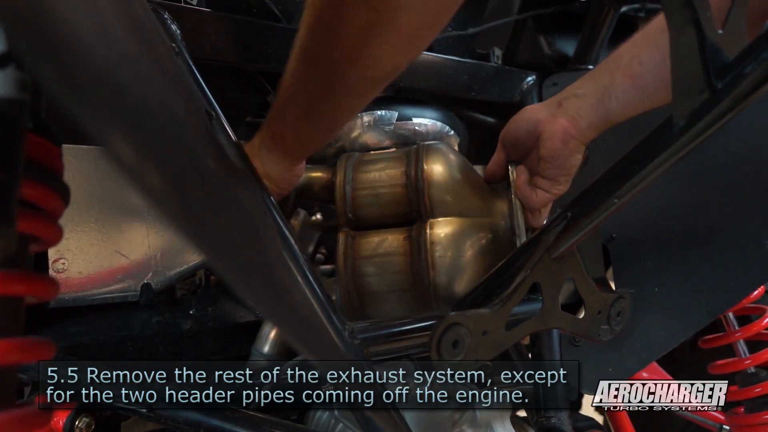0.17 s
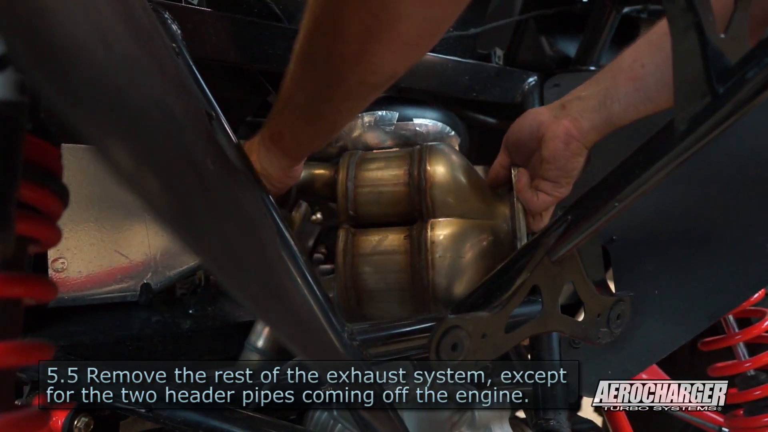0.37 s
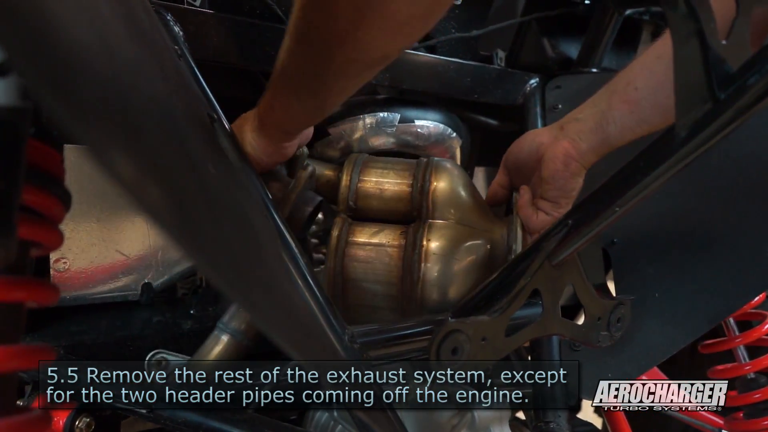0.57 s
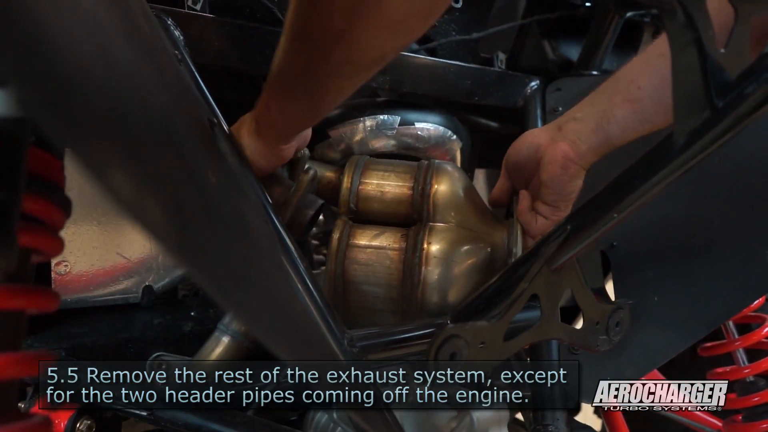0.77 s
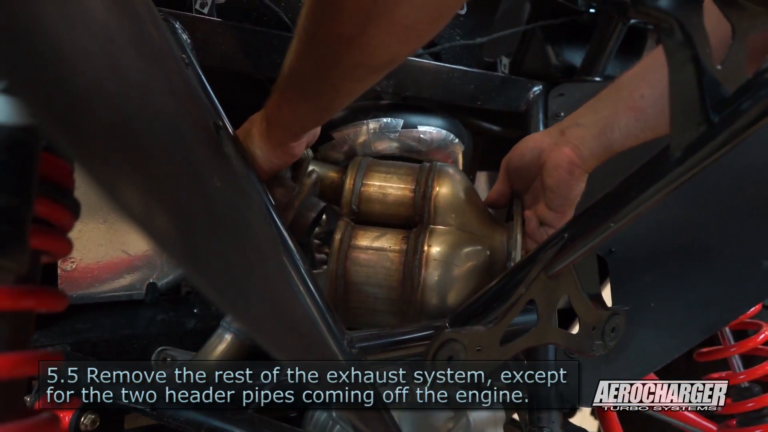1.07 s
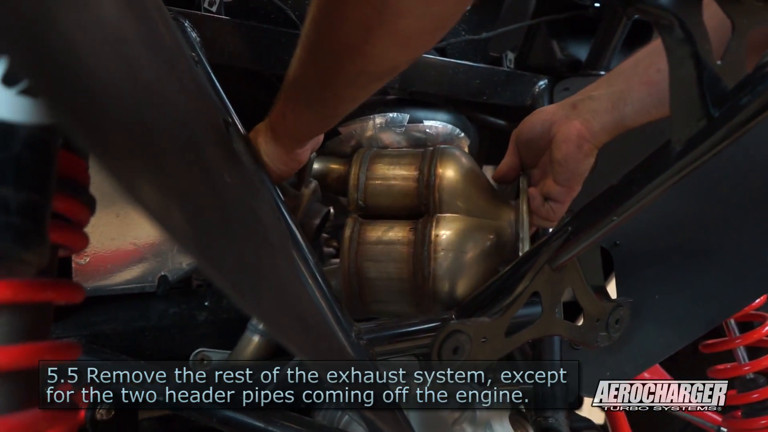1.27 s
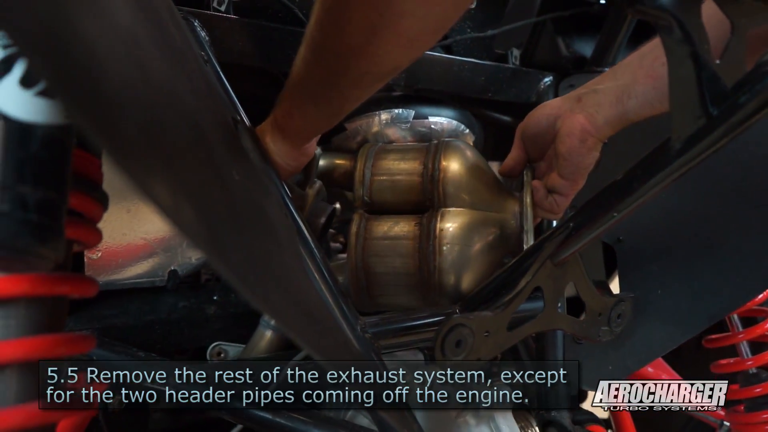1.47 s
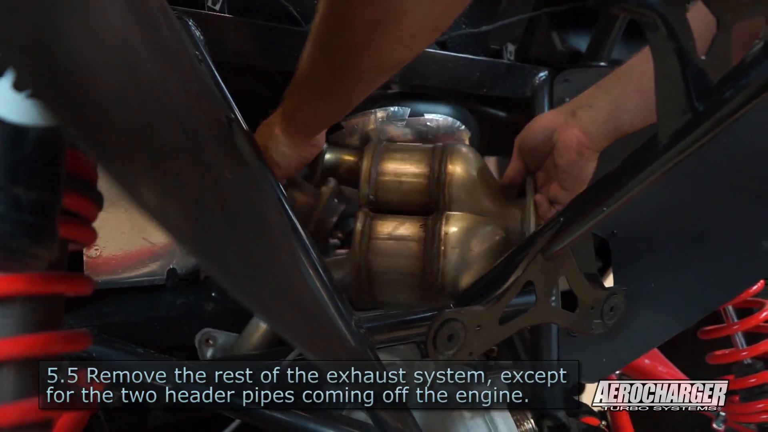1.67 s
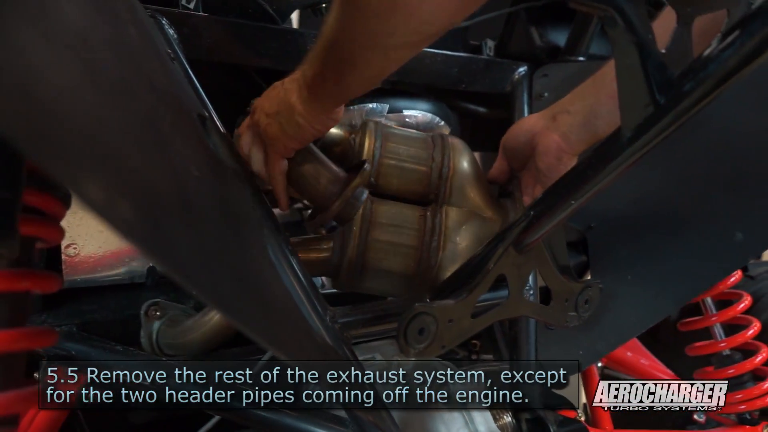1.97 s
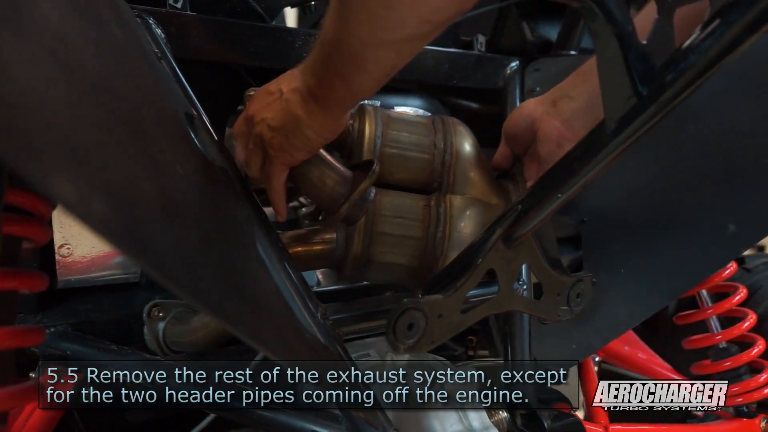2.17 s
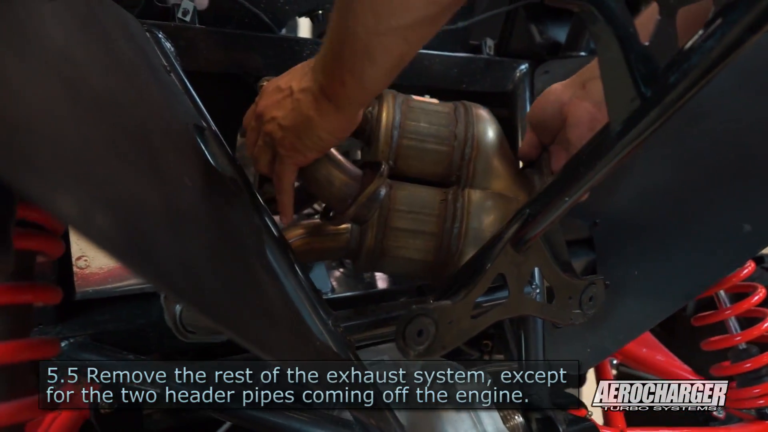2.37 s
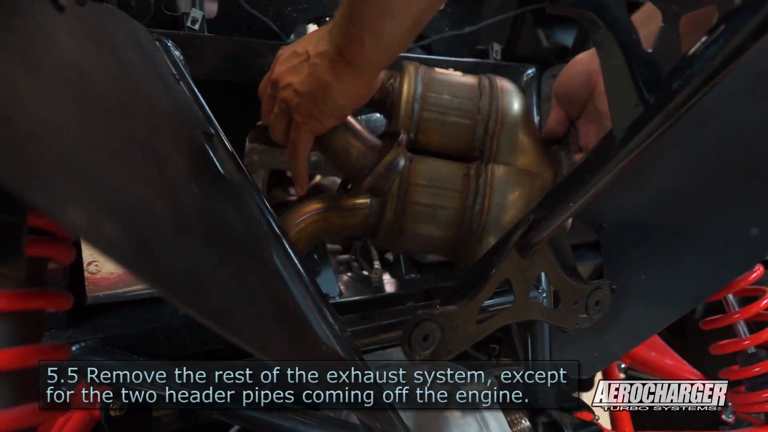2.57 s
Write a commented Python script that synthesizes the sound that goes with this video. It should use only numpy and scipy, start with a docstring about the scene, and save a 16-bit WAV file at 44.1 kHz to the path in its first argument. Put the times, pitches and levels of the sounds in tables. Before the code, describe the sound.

Metal exhaust part knocking and rubbing on a vehicle frame as it is worked loose by hand

```python
"""Over a constant low room rumble and steady hum (shaped noise and a sine), faint and heavy knocks
come in uneven bursts with scrapes: a steel exhaust pipe is worked out of a vehicle frame by hand, in a garage.
Knocks and scrapes excite decaying sine modes of pipe and frame plus a dense noise clatter;
filtered noise gives a deep shudder under each knock and some bright ticks.
A decaying noise tail puts knocks, scrapes and ticks into the room."""
import sys
import numpy as np
from scipy import signal
from scipy.fft import irfft
from scipy.io import wavfile

SR = 44100
rng = np.random.default_rng(int(sys.argv[2]) if len(sys.argv) > 2 else 0)


def wrap_up_sound(samples):
    """Save the sound to the file named by the first command line argument, as 16-bit audio."""
    columns = np.atleast_2d(samples).T
    # keep every value between -1 and 1, then stretch to whole-number steps
    tamed = np.clip(columns, -1, 1)
    steps = np.round(tamed * 32767).astype(np.int16)
    wavfile.write(sys.argv[1], SR, steps)


N = 121275  # length in samples

# spectrum shape of the room rumble [f/Hz, relative level/dB]
RUMBLE_SPECTRUM = [(25, -2), (190, -8), (400, -20), (1600, -28), (5000, -32.5), (16000, -46.5)]
# single blows of pipe on frame [t/s, thud level/dB, clank level/dB, upper clank level/dB,
# high ring level/dB, tick level/dB, favoured f/Hz, second favoured f/Hz, ring length factor (held to 0.2-1.3)]
KNOCKS = [(0.102, -48, -37.5, -53, -59, -62, 1655, 2233, 0.97),
          (0.201, -36.5, -29, -43, -46.5, -55, 1331, 2233, 2.7),
          (0.226, -27, -25.5, -37.5, -35.5, -37, 2233, 4317, 1.0),
          (0.329, -34, -27.5, -35.5, -36.5, -49, 1331, 4574, 0.52),
          (0.476, -39.5, -28, -39.5, -44.5, -48.5, 1655, 1331, 2.5),
          (0.502, -19, -27.5, -33.5, -34, -56, 267, 1331, 0.46),
          (0.538, -14.5, -16, -33, -26.0, -27, 577, 1290, 1.9),
          (0.546, -35, -16.5, -28, -35, -49, 1190, 4317, 1.9),
          (0.614, -30, -37, -29.5, -29.5, -38, 1824, 2998, 0.78),
          (0.876, -38.5, -29.5, -44.5, -49.5, -64, 1655, 2233, 0.88),
          (0.932, -28.5, -33, -48, -50.5, -56, 637, 1290, 1.5),
          (0.984, -31, -26, -36.5, -44.5, -52, 1655, 2950, 0.68),
          (1.131, -16, -20, -28.5, -27.5, -31, 1555, 367, 0.77),
          (1.145, -18.0, -21.5, -33.5, -37, -64, 267, 1824, 1.6),
          (1.166, -24, -21, -32, -26.5, -31.5, 1655, 4574, 0.78),
          (1.233, -35.0, -33.5, -36, -46, -57, 1824, 2509, 1.03),
          (1.294, -34.5, -29.5, -38.5, -40.5, -52, 1331, 4389, 0.61),
          (1.485, -34, -29.5, -37.5, -33, -45.5, 1824, 4389, 1.8),
          (1.508, -22.5, -19, -49, -41, -42.0, 1190, 637, 1.2),
          (1.53, -37, -24, -32.5, -27.5, -36, 1331, 4317, 0.58),
          (1.687, -37.5, -34, -46, -49.5, -56.5, 2233, 4317, 1.8),
          (1.728, -48.5, -31, -46.5, -44.5, -48.5, 1331, 4389, 0.75),
          (1.76, -29, -26.5, -38, -40.5, -48.5, 2509, 1655, 1.1),
          (1.773, -49, -27, -36, -42.5, -50, 1824, 2998, 0.66),
          (1.866, -43, -31.5, -39.5, -47, -55, 1331, 2893, 0.81),
          (2.014, -44, -32.5, -42, -53.5, -72.5, 1331, 3285, 1.8),
          (2.084, -25.0, -17, -19.5, -20, -20, 1190, 1824, 0.65),
          (2.119, -31.0, -25, -24, -26.5, -31, 1262, 3224, 1.9),
          (2.303, -27.5, -29, -39, -35, -44.5, 2440, 1555, 1.0),
          (2.452, -39, -26.5, -31, -37.5, -39, 2233, 2950, 0.98)]
# drags of pipe along frame [t/s, length/s, thud level/dB, clank level/dB, upper clank level/dB,
# high ring level/dB, tick level/dB, favoured f/Hz, second favoured f/Hz]
SCRAPES = [(0.147, 0.082, -45, -49, -55, -51, -55.5, 193, 1331),
           (0.227, 0.049, -32, -28.5, -41, -38.5, -50.5, 1331, 4317),
           (0.429, 0.081, -45, -47.5, -60, -53.5, -56, 193, 4317),
           (0.506, 0.032, -20.5, -21.5, -35.5, -33, -36, 193, 1331),
           (0.555, 0.07, -26.5, -21.5, -35, -30, -38, 1655, 4317),
           (0.646, 0.16, -46.5, -57, -59, -60, -82, 193, 6500),
           (1.169, 0.081, -32.5, -27.5, -50.5, -43, -72, 1655, 4574),
           (1.301, 0.16, -43.5, -51, -60.5, -56.0, -61.5, 193, 1824),
           (1.559, 0.11, -41, -45, -53, -63, -68, 1190, 4270),
           (1.713, 0.11, -38, -57, -46.5, -57, -59, 267, 6591),
           (1.92, 0.092, -39.5, -40, -50.5, -56.0, -55, 193, 1262),
           (2.088, 0.029, -61, -17, -23.5, -31, -35, 1655, 4574),
           (2.136, 0.065, -40, -27.0, -39.5, -39.5, -58, 1262, 2950),
           (2.307, 0.1, -35, -39.5, -54.5, -56, -63, 130, 1290)]
# tiny sharp ticks of grit and edges [t/s, level at onset/dB, f/Hz]
TICKS = [(1.04, -41, 11000), (1.9, -37, 11600), (1.78, -40, 9950), (2.724, -50, 9100), (2.305, -31.5, 4200)]
# ring modes of the pipe shell [f/Hz]
PIPE_HZ = [1190, 1262, 1290, 1331, 1555, 1655, 1824, 2233, 2311, 2440, 2509, 2893, 2950, 2998, 3165, 3224,
           3285, 4317, 4389, 4574, 4987, 6200, 6591, 7987, 8473, 9485]
# strength of each shell mode, in the same order [relative level/dB]
PIPE_DB = [1.5, -2.5, 2.5, -3, -5, -3, -1, -7.5, -8.5, -11.5, -12, -4, -3, -7.5, -12, -6.5, -3.5, -2.5,
           -8.5, -5, -6, -22.5, -17, -18.5, -8, -10]
# ring time of the shell over pitch [f/Hz, t60/s]
PIPE_T60 = [(1200, 0.15), (4800, 0.3), (6600, 0.45), (8000, 0.12)]
# ring modes of the frame [f/Hz, level among the frame modes/dB]
FRAME_MODES = [(129.6, -4.5), (193.4, -4.5), (267.3, -4), (367.5, -6), (422.3, -2.5), (524.6, -9.5),
               (576.5, -7.5), (637.7, -8.5)]
# spectrum shape of the dense clatter of both parts [f/Hz, relative level/dB]
CLATTER_SPECTRUM = [(100, -28), (180, 5), (300, -1.5), (650, 3), (950, 4), (1400, 1), (1800, -1),
                    (2050, -7.5), (2400, -7.5), (2700, -10.5), (3150, 6.5), (3900, -7.5), (5000, -5),
                    (9300, -34), (15500, -35.5)]
# borders of thud | clank | upper clank | high ring | tick [f/Hz]
EDGES_HZ = (1060, 2550, 3800, 7000)

RUMBLE_DB = -47.5
MAINS_HZ, MAINS_DB = 119, -54.5
FRAME_DB = -3  # frame against pipe
FRAME_T60_S, FRAME_T60_HZ = 0.18, 285  # ring time at this pitch; lower modes ring longer
OVERTONE_DB, OVERTONE_T60_S = -17.5, 0.2  # the many weak upper modes of the shell
SPOT_DB, SPOT_WIDTH = 8.5, 0.014  # lift of the favoured pitches; width as log frequency ratio
SCATTER_DB = 4  # random spread of the mode strengths
DETUNE = 0.002  # pressure of the contact shifts the ring a little (spread, as a ratio)
TWIN_DB, TWIN_SPLIT = -11, 0.0071  # a weaker twin set of modes, as the shell is not quite round
CLATTER_DB, CLATTER_T60_S, THUD_T60_S = 10, 0.11, 0.19  # the thud part of the clatter dies slower
SOFT_RANGE_DB = 30  # a knock whose tick lies this far under its clank is fully soft
SOFT_SPOT_DB, SOFT_CLATTER_DB = 2, -5  # soft knocks ring purer
ATTACK_S, RING_S = 0.0022, 0.7  # onset ramp; length rendered for each response
BLOW_S = 0.015  # a knock's band levels hold over this time
THUD_LOW_HZ = 128
BUMP_HZ, BUMP_DB, BUMP_T60_S = 43.8, -16, 0.27  # shudder level is relative to the knock's clank
ROOM_DB, ROOM_T60_S, ROOM_TREBLE_T60_S, ROOM_GAP_S = -11.5, 0.46, 0.44, 0.0051
SLIPS_PER_S, SLIP_SCATTER_DB = 300, 2
PRESSED_LENGTH = 0.67  # ring length factor while the pipe is pressed against the frame
RUB_BASS_DB, RUB_BASS_HZ = 9.5, 223  # dragging shakes the low frame modes more than a blow does
TICK_T60_S = 0.058
TOP_HZ = 15800


def undb(db):
    """Level in dB to amplitude."""
    return 10 ** (np.asarray(db) / 20)


def rms(x):
    """Root mean square level, kept above zero."""
    return np.sqrt(np.mean(x ** 2)) + 1e-12


def fade(t, t60):
    """Exponential decay by 60 dB in t60 seconds."""
    return np.exp(-np.log(1000) * t / t60)


def cut(x, hz, kind, order=4):
    """Butterworth filter."""
    return signal.sosfilt(signal.butter(order, hz, kind, fs=SR, output="sos"), x)


def add(out, start, x):
    """Mixes x into out from start seconds on."""
    i = int(start * SR)
    out[i:i + len(x)] += x[:len(out) - i]


def noise(points, size):
    """Random-phase noise of unit RMS whose spectrum runs through (Hz, dB) points."""
    hz, db = np.array(points, float).T
    f = np.maximum(np.fft.rfftfreq(size, 1 / SR), 1)
    phases = np.exp(2j * np.pi * rng.random(len(f)))
    x = irfft(phases * undb(np.interp(np.log(f), np.log(hz), db)), size)
    return x / rms(x)


def background():
    """Room rumble from shaped noise, with a mains hum as one steady sine."""
    rumble = undb(RUMBLE_DB) * noise(RUMBLE_SPECTRUM, N)
    hum = np.sqrt(2) * np.sin(2 * np.pi * MAINS_HZ * np.arange(N) / SR)
    return rumble + undb(MAINS_DB) * hum


def metal(t, count=90):
    """Pitches, strengths and decaying vibrations of all modes of pipe and frame."""
    pipe_t60 = np.interp(PIPE_HZ, *np.array(PIPE_T60).T)
    pipe = list(zip(PIPE_HZ, PIPE_DB, pipe_t60))
    frame = [(hz, db + FRAME_DB, FRAME_T60_S * np.sqrt(FRAME_T60_HZ / hz)) for hz, db in FRAME_MODES]
    # overtones weaken by 6 dB per octave above 7 kHz
    upper = [(hz, OVERTONE_DB - 6 * max(np.log2(hz / 7000), 0), OVERTONE_T60_S)
             for hz in rng.uniform(2900, 15000, count)]
    hz, db, t60 = np.array(pipe + frame + upper).T
    turn = (2 * np.pi * hz[:, None] * t).astype(np.float32)
    decay = fade(t, t60[:, None]).astype(np.float32)
    return hz, db, np.sin(turn) * decay, np.cos(turn) * decay


def response(t, modes, spots_hz, soft):
    """What one contact sets off: the modes, weighted by the spot, their twins and a short dense clatter."""
    hz, db, sines, cosines = modes
    nearness = sum(np.exp(-(np.log(hz / spot) / SPOT_WIDTH) ** 2) for spot in spots_hz)
    favour_db = (SPOT_DB + soft * SOFT_SPOT_DB) * nearness
    ring = 0
    for weight_db, shift in ((favour_db, DETUNE), (TWIN_DB, TWIN_SPLIT)):
        gain = undb(db + SCATTER_DB * rng.standard_normal(len(hz)) + weight_db)
        angle = 2 * np.pi * rng.random(len(hz))
        tones = (gain * np.cos(angle)).astype(np.float32) @ sines
        tones = tones + (gain * np.sin(angle)).astype(np.float32) @ cosines
        # reading the tones faster or slower shifts their pitch
        ring = ring + np.interp(t * (1 + shift * rng.standard_normal()), t, tones)
    dense = noise(CLATTER_SPECTRUM, len(t))
    low = cut(dense, EDGES_HZ[0], "low", order=3) * fade(t, THUD_T60_S)
    high = cut(dense, EDGES_HZ[0], "high", order=3) * fade(t, CLATTER_T60_S)
    clatter = undb(CLATTER_DB + soft * SOFT_CLATTER_DB) * (low + high)
    return (ring + clatter) * np.minimum(t / ATTACK_S, 1)


def damped(t, length):
    """Envelope that scales a 0.25 s ring by the length factor: hands and frame shorten it, above 1 it lasts longer."""
    return fade(t * (1 / np.clip(length, 0.2, 1.3) - 1), 0.25)


def voiced(x, levels_db, length):
    """Sets thud, clank, upper clank, high ring and tick of a contact to their RMS levels over its first moments."""
    a, b, c, d = EDGES_HZ
    thud = cut(cut(x, a, "low", order=8), THUD_LOW_HZ, "high", order=2)
    bands = thud, cut(x, (a, b), "band"), cut(x, (b, c), "band"), cut(x, (c, d), "band"), cut(x, d, "high")
    first = int(length * SR)
    return sum(band * undb(db) / rms(band[:first]) for band, db in zip(bands, levels_db))


def knocks(t, modes):
    """Single blows set the metal ringing; hands and frame damp some sooner than others."""
    out = np.zeros(N)
    for start, thud, clank, upper, high, tick, *spots_hz, length in KNOCKS:
        soft = np.clip((clank - tick) / SOFT_RANGE_DB, 0, 1)
        blow = response(t, modes, spots_hz, soft) * damped(t, length)
        add(out, start, voiced(blow, (thud, clank, upper, high, tick), BLOW_S))
    return out


def shudder(t):
    """Each knock shakes the whole vehicle a little: a fading burst of very low noise."""
    out = np.zeros(N)
    for start, _, clank_db, *_ in KNOCKS:
        rumble = cut(rng.standard_normal(len(t)), BUMP_HZ, "low", order=2)
        add(out, start, undb(clank_db + BUMP_DB) * rumble / rms(rumble) * fade(t, BUMP_T60_S))
    return out


def garage(x):
    """Adds the diffuse tail of the room, a decaying noise that is a little shorter in the treble."""
    t = np.arange(SR) / SR
    air = rng.standard_normal(SR)
    low = cut(air, 2050, "low", order=1) * fade(t, ROOM_T60_S)
    treble = cut(air, 2500, "high", order=1) * fade(t, ROOM_TREBLE_T60_S)
    tail = (low + treble) * (t > ROOM_GAP_S)
    tail = tail / np.sqrt(np.sum(tail ** 2))  # unit energy
    return x + undb(ROOM_DB) * signal.fftconvolve(x, tail)[:N]


def scrapes(t, modes):
    """The pipe drags along the frame in a run of small uneven slips, each setting off the same response."""
    out = np.zeros(N)
    for start, length, *levels_db, spot_hz, other_hz in SCRAPES:
        slip_now = rng.random(len(t)) < SLIPS_PER_S / SR
        slips = slip_now * undb(SLIP_SCATTER_DB * rng.standard_normal(len(t)))
        slips[0] = 1
        slip_sound = response(t, modes, (spot_hz, other_hz), soft=0) * damped(t, PRESSED_LENGTH)
        drag = signal.fftconvolve(slips * (t < length), slip_sound)
        drag = drag + undb(RUB_BASS_DB) * cut(drag, RUB_BASS_HZ, "low", order=1)
        add(out, start, voiced(drag, levels_db, length))
    return out


def ticks(t):
    """Very short, bright ticks of grit and edges: fading band-passed noise."""
    out = np.zeros(N)
    for start, db, hz in TICKS:
        band_hz = (0.8 * hz, min(1.25 * hz, 0.45 * SR))
        hiss = cut(rng.standard_normal(len(t)), band_hz, "band", order=2)
        add(out, start, undb(db) * hiss / rms(hiss) * fade(t, TICK_T60_S))
    return out


def scene():
    """Contacts sound in the room; shudder and background are added without the tail."""
    t = np.arange(int(RING_S * SR)) / SR
    modes = metal(t)
    contacts = knocks(t, modes) + scrapes(t, modes) + ticks(t)
    return (garage(contacts) + shudder(t) + background())[None]


def record(dry):
    """The recorder clips peaks at full scale, then a steep low-pass cuts the top."""
    top_cut = signal.ellip(8, 0.2, 70, TOP_HZ, fs=SR, output="sos")  # 0.2 dB ripple, 70 dB stop
    return signal.sosfilt(top_cut, np.clip(dry, -1, 1))


dry = scene()
out = record(dry)
wrap_up_sound(out)
```